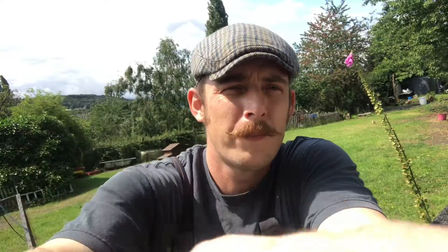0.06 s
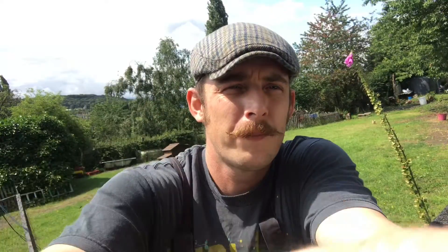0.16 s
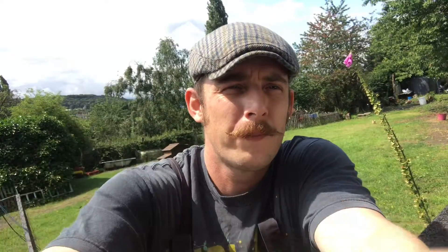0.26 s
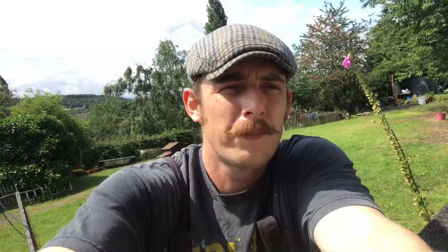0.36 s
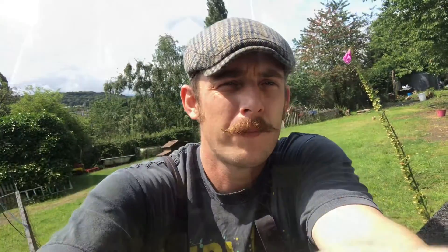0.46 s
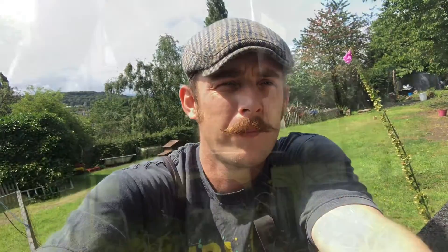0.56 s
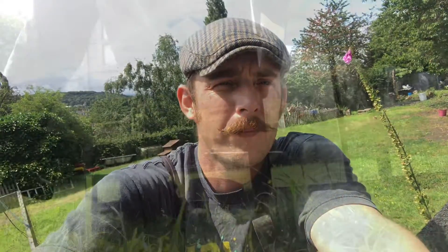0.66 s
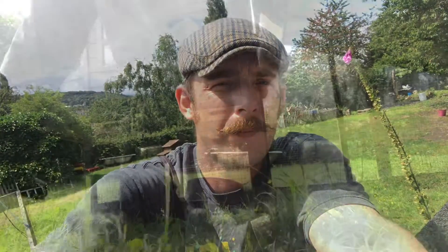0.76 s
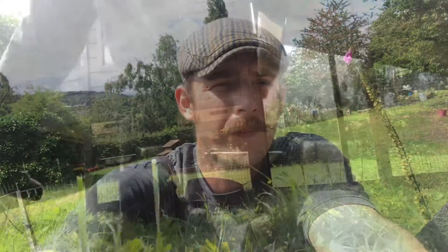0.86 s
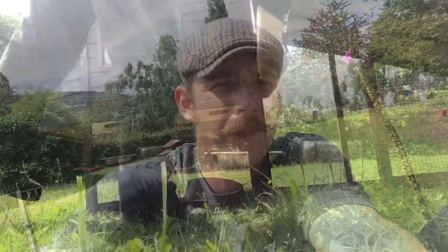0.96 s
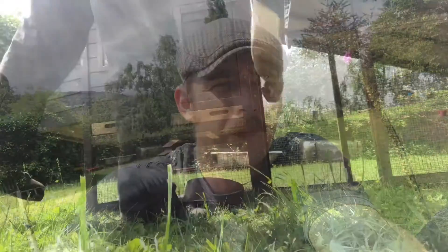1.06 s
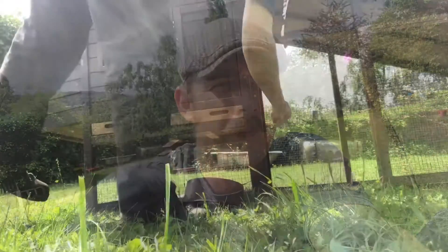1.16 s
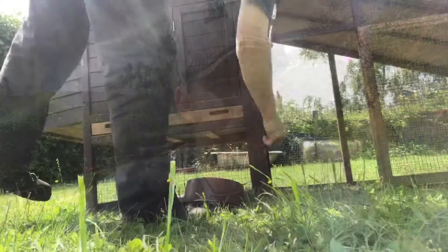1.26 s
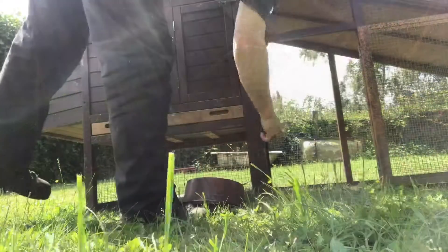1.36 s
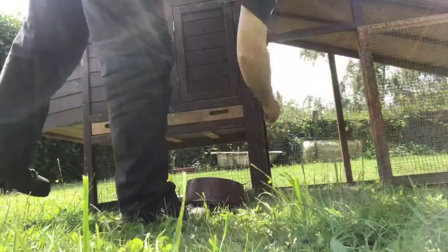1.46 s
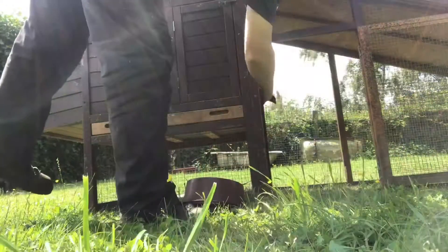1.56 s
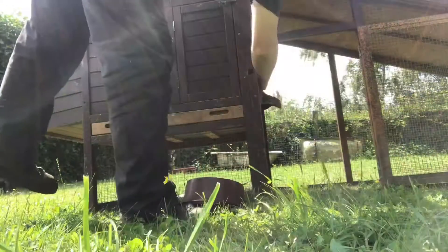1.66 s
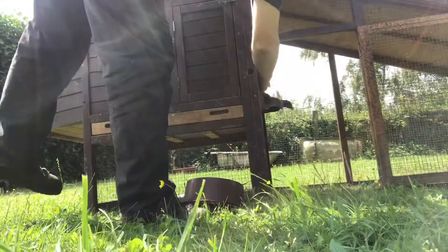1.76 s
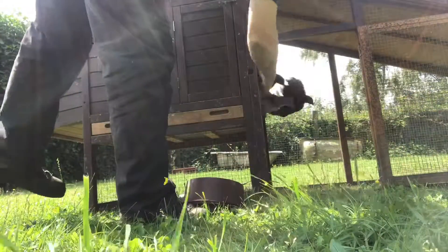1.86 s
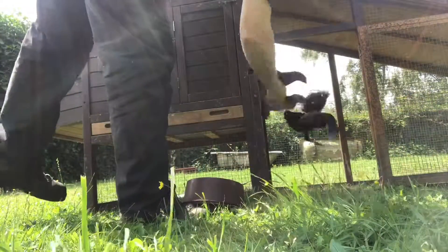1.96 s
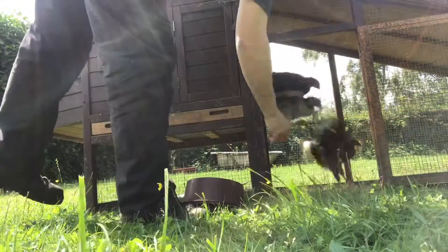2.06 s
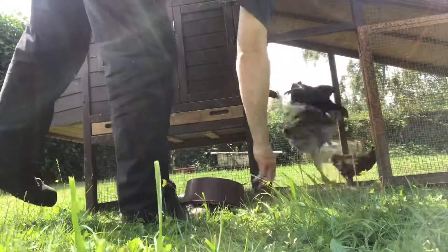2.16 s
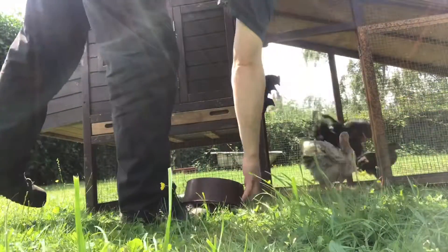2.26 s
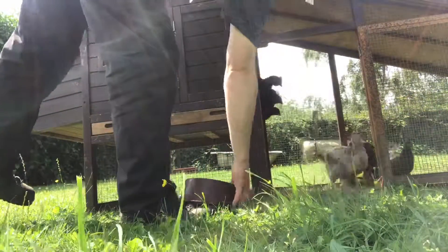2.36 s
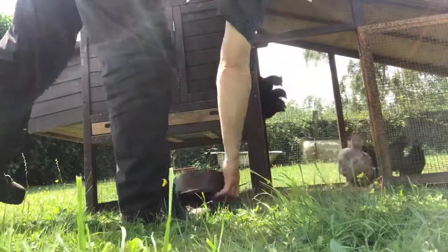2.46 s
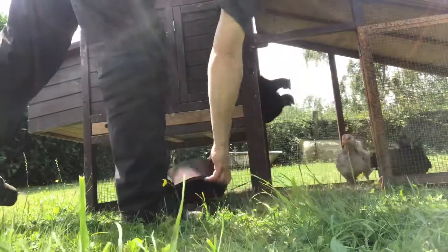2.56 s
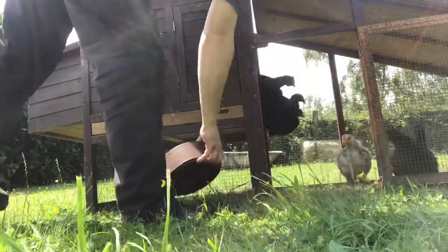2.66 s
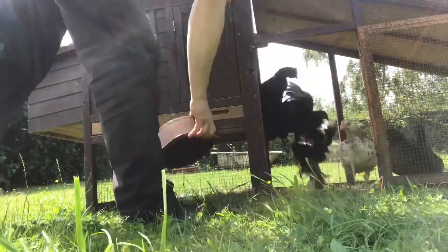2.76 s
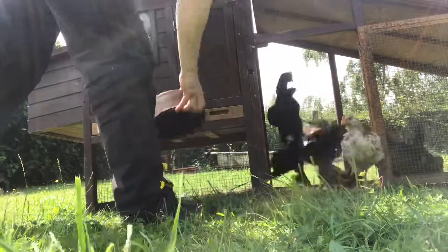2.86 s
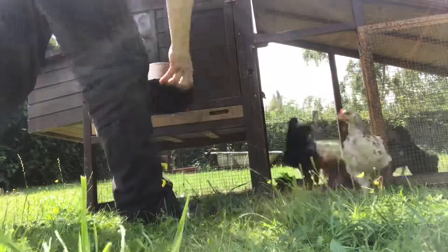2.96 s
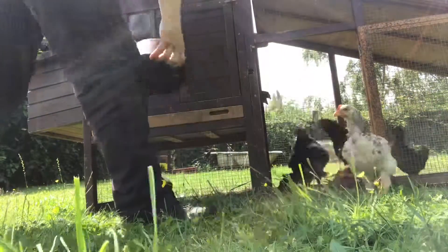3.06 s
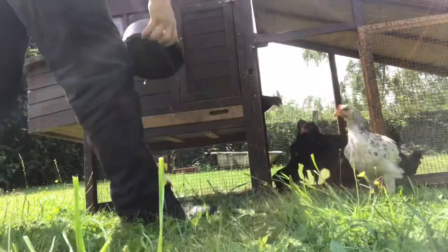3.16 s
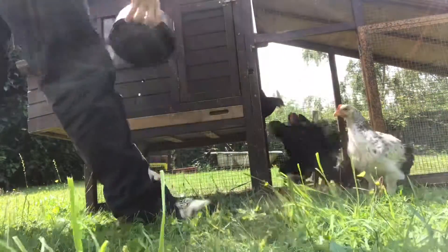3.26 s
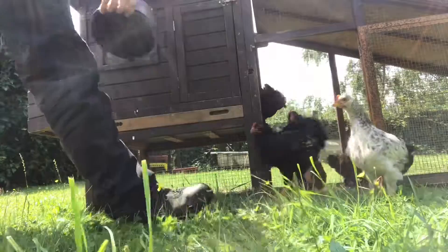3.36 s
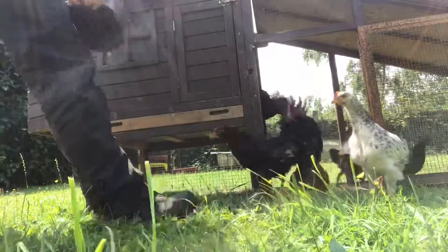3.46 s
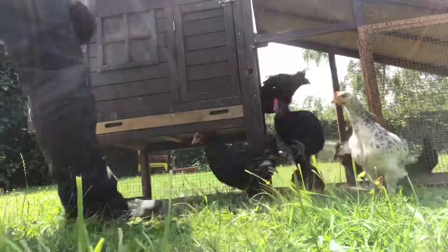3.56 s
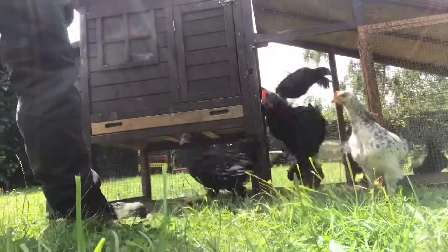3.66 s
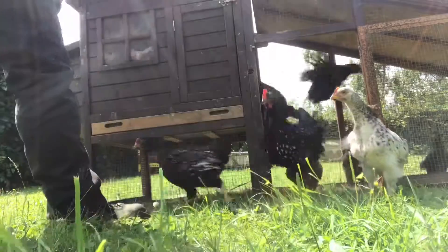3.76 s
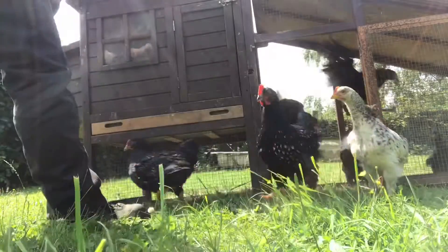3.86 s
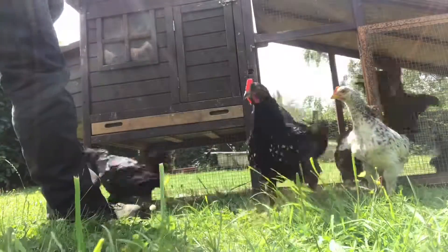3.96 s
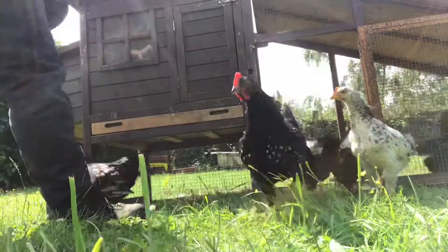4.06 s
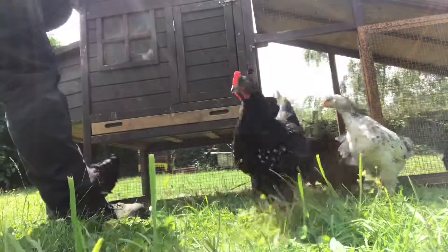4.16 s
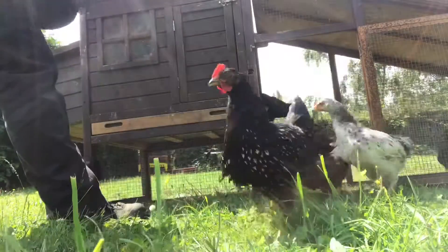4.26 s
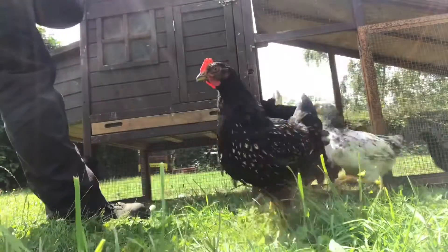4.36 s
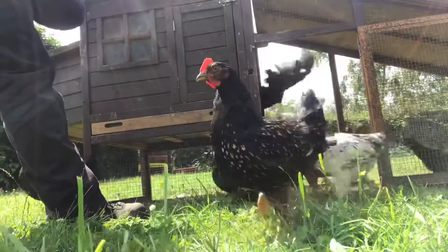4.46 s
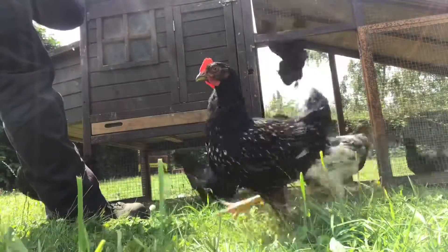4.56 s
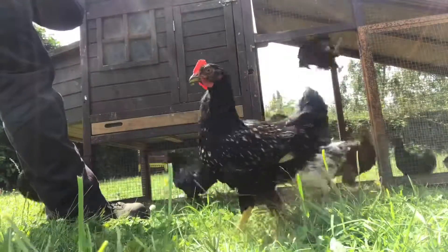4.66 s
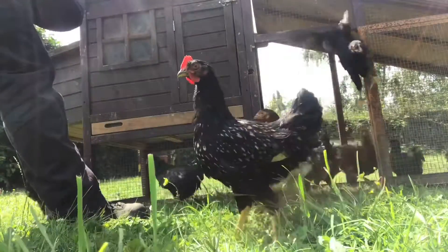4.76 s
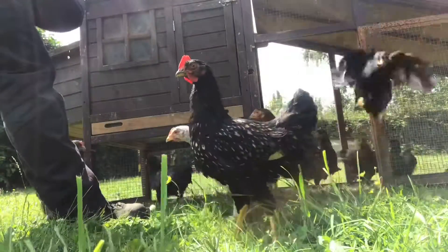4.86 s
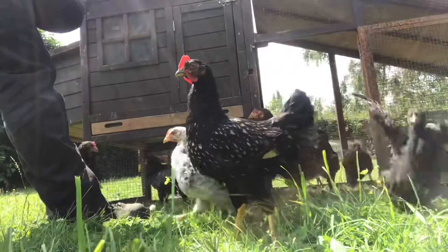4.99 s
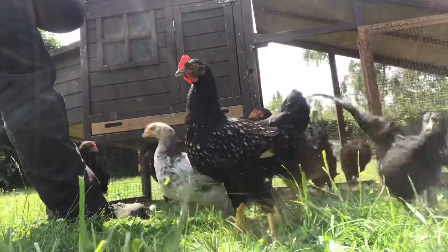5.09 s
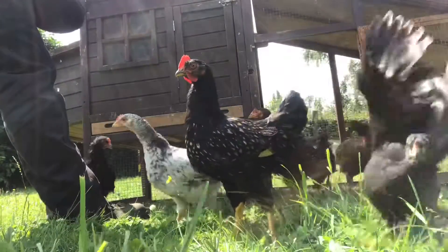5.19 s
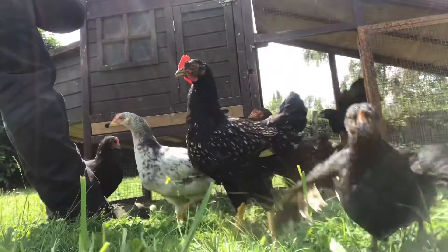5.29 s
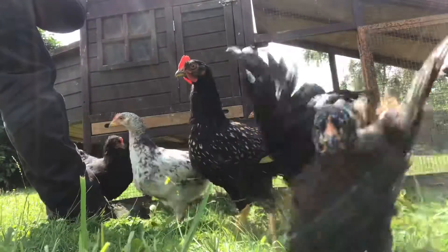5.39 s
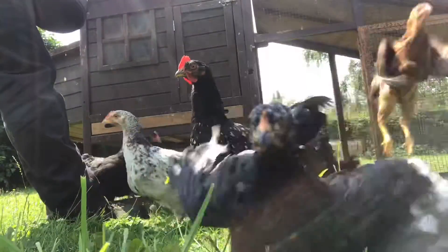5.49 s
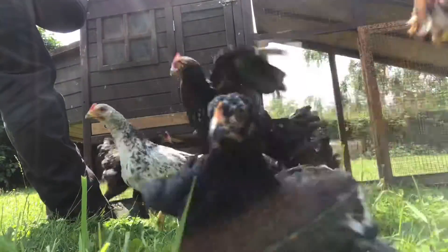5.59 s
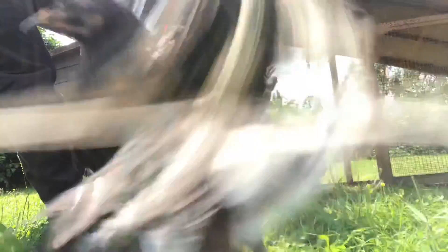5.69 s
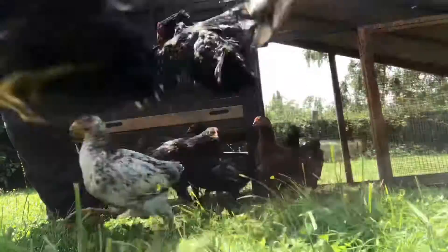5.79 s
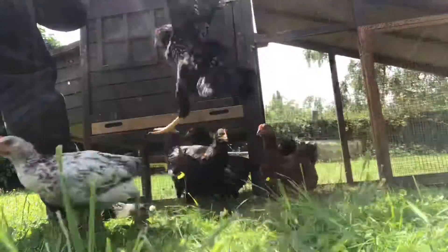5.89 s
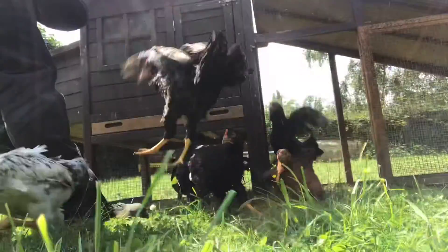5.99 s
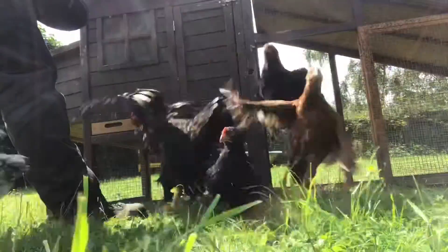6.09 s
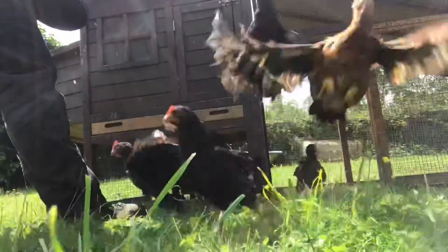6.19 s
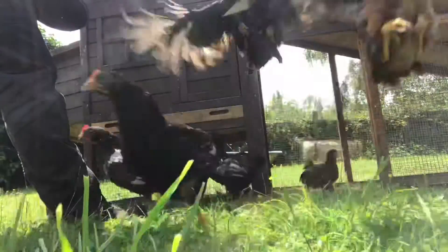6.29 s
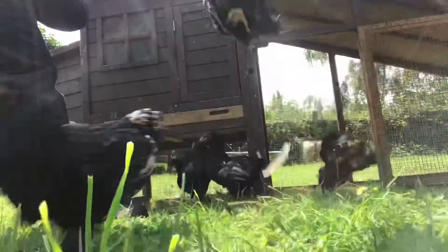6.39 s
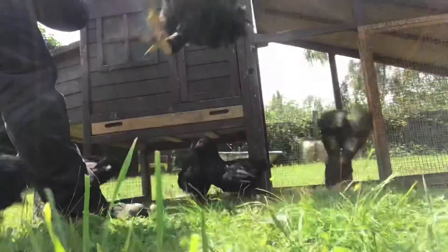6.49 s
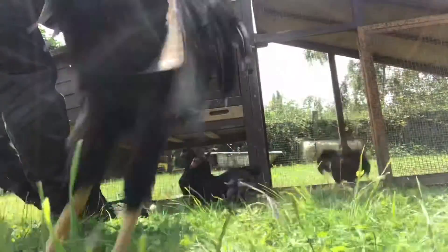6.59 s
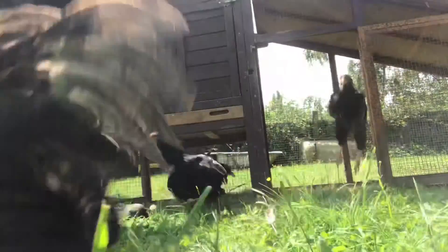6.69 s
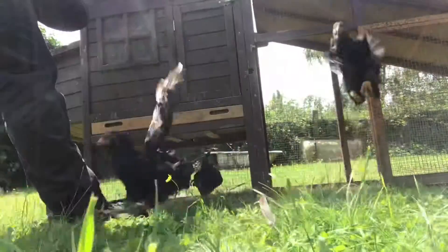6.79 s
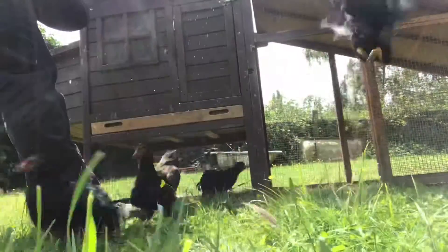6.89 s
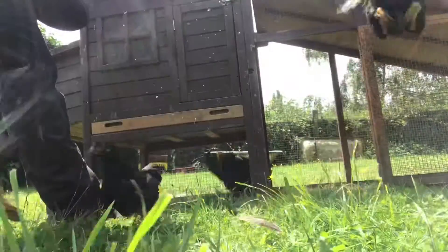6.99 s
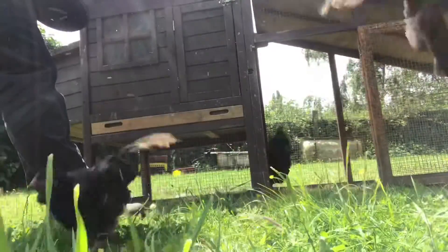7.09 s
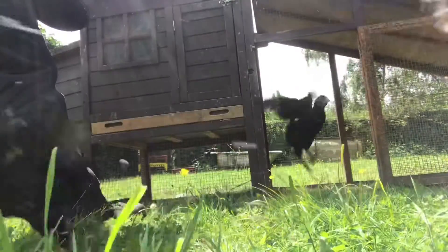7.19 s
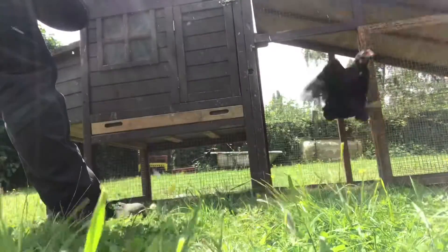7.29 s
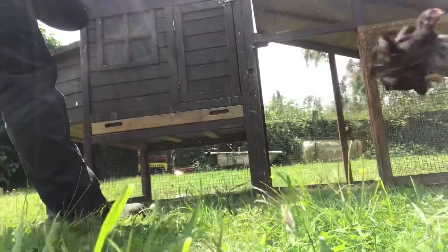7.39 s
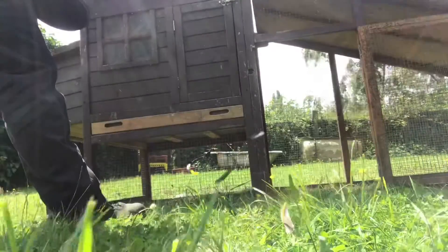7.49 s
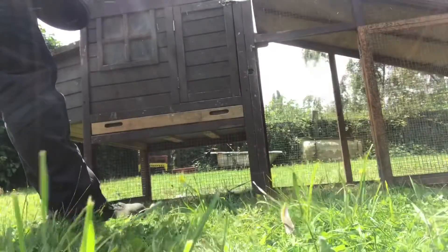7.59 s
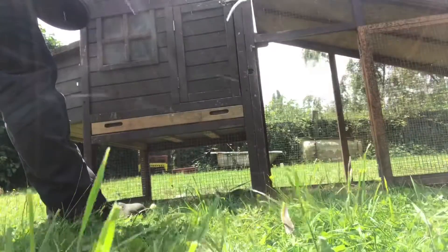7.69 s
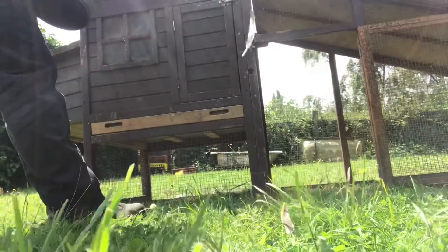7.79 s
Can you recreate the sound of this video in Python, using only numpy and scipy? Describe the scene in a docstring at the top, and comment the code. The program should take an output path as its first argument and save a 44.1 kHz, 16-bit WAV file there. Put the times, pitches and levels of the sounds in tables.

```python
"""Hens from coop to lawn

Hens leave a wooden coop onto a lawn: short gliding clucks and peeps, claws and a hatch ringing the boards.
Wing beats and feathers are bursts of grainy noise; from 5.6 s the flock takes fright and squawks close by,
built from syrinx partials and a beak resonance, while air blasts from wings thump on the microphone.
Below lie light wind and low buffeting, shaped noise, with more of the low buffeting in the first second."""
import sys
import numpy as np
from scipy import signal
from scipy.fft import rfft, irfft, next_fast_len
from scipy.io import wavfile

SR = 44100
rng = np.random.default_rng(int(sys.argv[2]) if len(sys.argv) > 2 else 0)


def to_wav(s):
    """Save 16-bit WAV."""
    ch = np.atleast_2d(s).T  # columns
    pcm = np.round(np.clip(ch, -1, 1) * 32767)  # PCM
    wavfile.write(sys.argv[1], SR, pcm.astype(np.int16))


N = 345832

# near squawks: (t/s, length/s, crest place as share of length, crest f/Hz, pitch arch as share,
#  crest level/dB, hoarseness 0-1, first partial/dB, third partial/dB, treble/dB,
#  beak resonance f/Hz, beak lift/dB, tilt/dB per octave); partials and treble are relative to the second
SQUAWK_CALLS = [(2.026, 0.039, 0.43, 754, 0.084, -29.5, 0.25, -12, -4, -15, 2950, 7, 2),
                (2.471, 0.065, 0.34, 671, 0.11, -45, 0.43, 6.5, -1, -1.5, 2520, 13, 4.5),
                (5.596, 0.034, 0.46, 627, 0.12, -40, 0.7, -1, -14, -7, 3800, 19, 0),
                (5.68, 0.03, 0.4, 654, 0.064, -20.5, 0.81, -35, -28, -12.5, 4070, 12, -15),
                (5.704, 0.036, 0.62, 639, 0.053, -17.5, 0.51, -24, -23, -14, 2440, 14, 0),
                (5.795, 0.05, 0.81, 520.4, 0.052, -21, 0.48, -44, -20, -15.5, 4150, 15, 5),
                (5.841, 0.041, 0.17, 685, 0.22, -22.5, 0.44, -21, -3.5, -7.5, 4380, 13, -7),
                (6.05, 0.046, 0.2, 650, 0.13, -32, 0.46, -12, -15, -14.5, 2600, -1, -14),
                (6.183, 0.053, 0.47, 656, 0.1, -24, 0.1, -20, -12.5, -25, 2400, 8, -2),
                (6.281, 0.047, 0.6, 602, 0.05, -15, 0.13, -14, -13, -17, 4300, 16, 6.5),
                (6.37, 0.058, 0.43, 700, 0.15, -7, 0.16, -23, -18.5, -13.5, 4570, 11, 8.5),
                (6.45, 0.065, 0.57, 683, 0.16, -9.5, 0.18, -20, -17.5, -12.5, 3350, 5.5, 11),
                (6.579, 0.059, 0.45, 692.4, 0.17, -8, 0.18, -19, -15, -11.5, 4340, 18.5, 11),
                (6.757, 0.05, 0.45, 617.6, 0.04, -20, 0.37, -17.5, -13, -14.5, 4460, 10, 7),
                (6.955, 0.068, 0.33, 589, 0.083, -37.5, 0.09, 2.5, -2, 9.5, 6050, 14, -7),
                (6.992, 0.063, 0.23, 615, 0.14, -33.5, 0.05, 0.5, -9, 3.5, 7100, 15, -10),
                (7.139, 0.084, 0.71, 593.5, 0.14, -32, 0.2, -6, -7, -3.5, 7000, 10, -3.5),
                (7.198, 0.058, 0.28, 632, 0.31, -28, 0.3, -7.5, -28, -6, 3560, 12, -2),
                (7.318, 0.062, 0.36, 706, 0.086, -31.5, 0.22, -18, -10, -17, 2800, 11, -6),
                (7.496, 0.066, 0.38, 671, 0.067, -41, 0.2, -21, -11, -11, 2650, 15, -11)]
# throat and beak colour of the upper partials: (f/Hz, level/dB)
BEAK_SPECTRUM = [(2000, 16), (3500, 11), (4600, 3), (5600, 1.5), (8000, -6.5), (11000, -10), (15000, -28)]
# small clucks and peeps: (t/s, nominal length/s, f/Hz, glide/Hz, level/dB, overtone/dB, hoarseness from 0)
CLUCK_CALLS = [(1.231, 0.039, 2780, -500, -51, -24, 0.2), (1.364, 0.031, 1360, 80, -39, -15, 0.16),
               (1.409, 0.031, 3080, 28, -49, -10, 0.37), (1.44, 0.014, 1406, -39, -39, -26, 0),
               (1.462, .03, 3020, -40, -51, -24, 0.15), (1.49, 0.053, 2580, 20, -54, -24, 0.1),
               (1.538, 0.025, 1570, -130, -35.5, -28, 0.08), (1.561, 0.015, 1710, 0, -35, -20, 0),
               (1.578, 0.0054, 1240, -200, -40, -24, 0.3), (1.643, 0.019, 1270, 0, -46.5, -24, 0),
               (1.697, 0.03, 1024, -20, -49, -24, 0), (1.793, 0.056, 1400, -600, -39, -11, 0.5),
               (1.825, 0.021, 590, -52, -39.5, -24, 0.2), (1.897, 0.018, 1690, -100, -35, -24, 0.3),
               (1.876, 0.02, 2210, 1700, -38, -24, 0.3), (1.888, 0.011, 2500, -1500, -34, -20, 0.4),
               (1.948, 0.032, 1980, -220, -28.5, -20, 0.35), (1.955, 0.038, 1400, -100, -41, -11, 0.15),
               (2.108, 0.035, 2830, -200, -41, -32, 0.2), (2.112, 0.034, 1885, -300, -29, -38, 0.24),
               (2.133, 0.012, 3000, -1200, -45, -30, 0.2), (2.146, .017, 2230, -200, -29.5, -30, .4),
               (2.159, 0.025, 1513, -100, -34.5, -29, 0.5), (2.292, 0.014, 1766, -600, -35, -30, 0.24),
               (2.303, 0.021, 1970, -18, -35.5, -32, 0.2), (2.308, 0.013, 1030, -50, -47, -24, 0.1),
               (2.423, 0.031, 3000, 410, -44.5, -29, .15), (2.444, 0.018, 1560, -20, -31, -26, 0.04),
               (2.464, 0.06, 1560, -520, -41, -29, 1.02), (2.585, 0.017, 1535, -110, -35.5, -36, 0.24),
               (2.655, 0.043, 1090, -100, -40.5, -29, 0.3), (2.661, 0.046, 1640, 0, -39.5, -27, 0.6),
               (2.708, 0.054, 1884, -300, -37, -13, 1.17), (2.798, 0.022, 2540, -300, -38, -26, 0.88),
               (2.871, 0.034, 1603, -2, -38.5, -13, 0.48), (2.891, 0.033, 2110, 0, -43.5, -22, 0.65),
               (2.902, 0.035, 1170, -200, -44, -21, 0.6), (3.022, 0.015, 1470, 508, -45, -24, 0.1),
               (3.046, 0.0062, 1480, -100, -34, -22, 0.3), (3.051, 0.01, 1164, 0, -36.5, -22, 0.35),
               (3.093, 0.017, 1850, 2, -37, -24, 0.3), (3.112, 0.044, 1497, -150, -39, -13, 0.64),
               (3.153, 0.0082, 846, -70, -35.5, -5, 0), (3.244, 0.0093, 1760, -140, -37, -32, 0.15),
               (3.252, 0.024, 517, -67, -39.5, 3.5, 0.2), (3.386, 0.021, 980, -100, -43, -1.5, 0),
               (3.609, .022, 2295, 30, -47.5, -24, 0.1), (3.624, 0.036, 1266, -50, -53, -4, 0.03),
               (3.786, 0.018, 2290, -20, -45, -22, 0.15), (3.803, 0.027, 1320, -30, -46, -7, 0.03),
               (3.954, 0.029, 1113, 0, -40, -16, 0.14), (3.984, 0.022, 768, -110, -43.5, -9, 0.4),
               (3.985, 0.027, 2480, -330, -50, -24, 0.2), (4.171, 0.048, 952, -320, -41, -19, 0.32),
               (4.383, 0.014, 2320, -40, -47, -26, .02), (4.386, 0.039, 1290, -60, -44, -22, 0.07),
               (4.429, 0.011, 2350, 0, -48, -22, 0.2), (4.456, .021, 1360, 20, -49.5, -24, .15),
               (4.567, .017, 2280, 10, -52, -24, .07), (4.577, 0.035, 1300, -12, -44, -15, 0.25),
               (4.581, 0.013, 4100, 300, -51.5, -24, 0.6), (4.787, 0.019, 2380, -150, -48, -24, 0.2),
               (4.8, .036, 1480, 122, -48, -7.5, 0.42), (5.226, 0.017, 1250, 100, -44.5, -18, 0),
               (5.241, 0.04, 2540, -680, -46.5, -28, 0.3), (5.386, 0.055, 2370, -130, -55, -24, 0.3),
               (5.411, .019, 1310, -20, -50, -24, .02), (5.59, 0.034, 1600, 150, -39.5, -24, 0.1),
               (5.613, 0.031, 1240, 100, -35, -28, 0.6), (5.668, .018, 1440, 150, -38, -24, 0.3),
               (5.688, 0.015, 1555, -130, -20, -33, 0.14), (5.702, 0.022, 1704, -160, -26, -23, 0.72),
               (5.819, 0.026, 1695, 402, -18.5, -16, 0.25), (6.275, 0.015, 1285, -110, -35, -25, 1.01),
               (6.355, .03, 666, -110, -32.5, -22, 0.2), (6.363, 0.01, 4150, -400, -32, -35, 0.3),
               (6.432, 0.021, 1250, -5, -26.5, -21, 0.26), (6.81, 0.026, 654, -100, -34, -24, 0.2),
               (6.824, 0.017, 2150, 30, -37, -24, 0.26), (6.835, 0.026, 1460, -90, -32.5, -27, .35),
               (6.87, 0.012, 1230, 150, -39, -26, 0.3), (6.902, 0.023, 1233, -100, -30, -35, 0.35),
               (7.041, 0.015, 1390, -92, -22, -23, 0.44), (7.18, 0.022, 1830, 0, -33, -24, 0.1),
               (7.328, 0.034, 2062, -130, -45, -24, .02), (7.383, 0.041, 984, 140, -39, -24, 0.44),
               (7.503, 0.034, 1905, -320, -42, -24, 0.4), (7.588, 0.018, 853, 110, -40.5, -24, 0.14),
               (7.753, 0.021, 1647, -20, -43.5, -24, 0.4), (7.761, 0.031, 1116, -20, -40, -18, 0.15)]
# wing beats and feather rustles: (t/s, time scale/s, hiss level/dB, swish over hiss/dB)
WING_BEATS = [(0.746, 0.0094, -58, 11), (1.201, 0.0066, -54, 11.5), (1.277, 0.011, -60, 18.5),
              (1.363, 0.023, -54, 20), (1.487, 0.0097, -59, 20), (1.609, .005, -55, 13),
              (1.585, 0.015, -55, 17.5), (1.821, 0.013, -54.5, 15.5), (1.923, 0.011, -46, 15.5),
              (2, 0.0073, -61, 15), (2.084, 0.0055, -73, 11), (2.159, 0.0044, -39, 7.5),
              (2.165, 0.0088, -54, 25), (2.232, 0.0085, -47, 9), (2.337, 0.017, -48, 12.5),
              (2.677, 0.094, -46.5, 9), (2.694, 0.033, -45, -7), (2.77, 0.0052, -52, 3),
              (2.787, 0.0077, -46.5, 6), (2.799, 0.027, -39.5, 4.5), (2.865, 0.014, -51, 9),
              (2.967, 0.014, -45, 9), (3.105, 0.052, -45.5, 0.5), (3.36, 0.0071, -46, -4),
              (3.393, 0.017, -59, 17), (3.518, 0.012, -52, 6.5), (3.626, 0.18, -58.5, -14),
              (3.932, 0.039, -52, 10.5), (4.011, 0.036, -55.5, 10), (4.579, 0.012, -51.5, -3),
              (4.629, 0.027, -55, 10.5), (4.685, 0.025, -55.5, 11.5), (4.711, 0.024, -46, 6.5),
              (4.848, 0.071, -49, 8), (5.1, 0.04, -51, -7), (5.5, 0.0028, -35, -30),
              (5.512, 0.063, -53, -23), (5.641, 0.025, -58, 20), (5.742, 0.019, -45, 8),
              (5.845, 0.018, -27, 5), (5.9, 0.02, -55, 18.5), (5.961, 0.064, -52, 11),
              (6.182, 0.042, -41.5, 13.5), (6.239, 0.013, -42, -10), (6.436, 0.011, -46, 8),
              (6.649, 0.0071, -44, -14), (7.115, 0.011, -48, -4), (7.224, 0.014, -32, 4),
              (7.255, 0.015, -39, -15), (7.283, 0.023, -45, 9), (7.332, 0.023, -39.5, 10.5),
              (7.386, 0.025, -47.5, 8), (7.46, 0.0079, -36.5, 6.5), (7.515, 0.033, -51.5, 12),
              (7.623, 0.056, -53, -4), (7.738, 0.038, -46, -6)]
# claws and hatch on boards: (t/s, level/dB, dullness/dB per octave)
BOARD_KNOCKS = [(0.434, -34, 7.5), (1.116, -40, -3.5), (1.371, -29.5, 9), (1.929, -20, -3),
                (2.206, -32.5, -5.5), (2.39, -33, 0), (3.517, -35, 4), (5.602, -34, -4),
                (6.14, -27.5, 13.5), (6.154, -35.5, 13.5), (6.879, -27.5, 10)]
# resonances of the boards: (f/Hz, level/dB, fall by 60 dB/s)
BOARD_MODES = [(346, -3.5, 0.0087), (580, -6, 0.018), (1110, -7.5, 0.023), (1390, -1.5, 0.0076),
               (2630, -10.5, 0.013), (3840, -38, 0.0074), (6100, -19.5, 0.0043)]
# ticks of claws and dry stalks: (t/s, level of first click/dB, f/Hz)
STALK_TICKS = [(2.6823, -37, 5750), (2.7204, -26, 3100), (2.7657, -29, 6450), (2.79, -31, 5840),
               (3.4694, -48, 3690), (3.7239, -40, 5020), (3.876, -40, 4110), (3.893, -41, 4520),
               (7.0464, -37, 3410)]
# low thumps of landings and wing blasts: (t/s, level/dB, f/Hz)
LOW_THUMPS = [(0.432, -30.5, 65), (0.704, -26, 154), (1.002, -29, 296), (1.288, -22, 170),
              (1.368, -16.5, 139), (1.589, -25, 210), (1.728, -16, 124), (1.735, -21, 333),
              (1.991, -23, 114), (2.079, -23, 88.5), (2.194, -25, 169), (2.381, -22, 133),
              (3.291, -22, 107), (3.322, -28.5, 171), (3.577, -28.5, 181), (3.747, -26.5, 150),
              (4.475, -29.5, 63.7), (4.56, -31, 60.3), (4.896, -29.5, 330), (4.96, -29.5, 64),
              (5.013, -31, 265), (5.076, -28.5, 64.4), (5.836, -7.5, 60.5), (6.138, -13.5, 60),
              (6.197, -16.5, 82), (6.282, -16, 81), (6.334, -23.5, 126), (6.817, -15.5, 75),
              (6.846, -23, 80.6), (6.895, -9, 61.4), (6.971, -29, 117), (6.992, -22, 141),
              (7.016, -24, 101), (7.121, -19, 76), (7.299, -17, 67), (7.311, -19.5, 223), (7.437, -21, 296),
              (7.75, -18.5, 135.5), (7.771, -17.5, 57)]
# course of the background: (t/s, wind level/dB, flock shuffle level/dB)
BACKGROUND_LEVELS = [(0.0, -50.5, -63.5), (1.05, -46.5, -57), (1.35, -41, -54.5), (1.7, -38, -51.5),
                     (1.99, -40.5, -44), (2.44, -41.5, -51.5), (2.84, -43.5, -48), (3.38, -44, -53),
                     (3.5, -46.5, -53.5), (5.17, -45, -59), (5.45, -48.5, -52), (5.7, -39.5, -48),
                     (6.01, -39.5, -51.5), (6.18, -35.5, -49.5), (6.4, -45, -44), (6.66, -36, -51.5),
                     (6.94, -25, -45.5), (7.29, -37.5, -46), (7.55, -36.5, -50), (7.84, -35.5, -60.5)]
# feet and feathers come close on the lawn: (t/s, rustle over shuffle/dB)
LAWN_RUSTLE = [(1.3, -25), (3.5, -9.5), (5.6, -6)]
# start and end of the easing of the extra buffeting: (t/s, t/s)
BUFFETING_EASES_S = (0.27, 1.42)
# colour of wind on the microphone: (f/Hz, level/dB)
WIND_SPECTRUM = [(20, -51), (35, 5), (45, 17), (65, 18), (100, 10), (200, -41.5)]
# colour of the low buffeting that rises with the wind: (f/Hz, level/dB)
BUFFETING_SPECTRUM = [(50, -41), (120, 2), (200, 0.5), (320, -2.5), (420, -9.5), (550, -12), (900, -21.5),
                      (2000, -30.5), (5000, -58)]
# colour of the flock's shuffle and the wing swish: (f/Hz, level/dB)
SHUFFLE_SPECTRUM = [(300, 10), (700, -5.5), (1500, 2), (2500, -3.5), (4000, -8.5), (7000, -15),
                    (10000, -56)]
# colour of feather hiss and grass rustle: (f/Hz, level/dB)
HISS_SPECTRUM = [(1500, -3.5), (4000, 3.5), (6500, 3.5), (10500, -2), (12500, -1), (16000, -5)]
# returns from ground and coop walls: (delay/s, level/dB)
WALL_ECHOES = [(0.009, -19.5), (.023, -27.5)]
# dips in the microphone's response: (f/Hz, width/Hz, share removed)
MICROPHONE_DIPS = [(4920, 460, 0.37), (10500, 290, 0.56)]

CUTOFF_HZ = 15800   # top of the microphone's band
# squawks
RASP, HOARSE_RASP = 0.24, 0.9   # noise riding on the upper partials: share in a clear call, extra in a hoarse one
EFFORT = 0.068   # gain of the upper partials in dB for each dB of swell
POINTED = 1.676   # the pitch crest is sharper than the swell by this power
SWELL_S, SAG_PER_S = 0.081, 0.45   # short calls are peaked, long ones hold; pitch share lost per second
BEAK_WIDTH = 0.14   # share of the resonance's pitch
DARKEN = 0.089   # dB per octave lost for each dB under the crest
# clucks
CLUCK_ARCH, ARCH_FROM_DB = 0.0054, -54   # share of pitch bowed upward per dB above this level
# contacts and thumps
STRIKE_SPREAD_DB = 2.5
CONTACT_CYCLES = 0.41   # a contact lasts about this many cycles of each mode
TICK_CYCLES = 13   # cycles to fall by 60 dB
# ring at 100 Hz and -11.5 dB; high and loud thumps ring more cycles
RING_CYCLES, CYCLES_PER_OCTAVE, CYCLES_PER_DB = 9.6, 9.1, 0.53
# buffeting level when wind is at -41 dB; share of the wind's swing it follows; extra at the start
BUFFETING_DB, BUFFETING_FOLLOWS, EARLY_BUFFETING_DB = -44.5, 0.82, 8.5


def amp(db):
    """Decibels to gain."""
    return 10 ** (np.asarray(db) / 20)


def rms_one(x):
    """Scale to unit rms."""
    return x / np.sqrt(np.mean(x ** 2) + 1e-20)


def at_hz(points, hz):
    """Read a spectrum table on a log-frequency axis."""
    table = np.array(points)
    return np.interp(np.log(hz), np.log(table[:, 0]), table[:, 1])


def drift(rate_hz, size=N):
    """Low-passed chance that wanders on the scale of rate_hz; rms 1."""
    r = np.exp(-2 * np.pi * rate_hz / SR)
    settle = 20000   # samples thrown away while the filter settles
    white = rng.standard_normal(size + settle)
    return rms_one(signal.lfilter([1], [1, -2 * r, r * r], white)[settle:])


def noise(spectrum, grain_db=0., per_s=4000.):
    """Steady noise plus random grains of uneven size, coloured by a spectrum; rms 1."""
    white = rng.standard_normal(N)
    hits = rng.random(N) < per_s / SR
    sizes = amp(grain_db * rng.exponential(1, N).clip(0, 4))
    white = white + hits * sizes * rng.choice([-1, 1], N)
    size = next_fast_len(N)
    hz = np.arange(size // 2 + 1) * SR / size + 1
    return rms_one(irfft(rfft(white, size) * amp(at_hz(spectrum, hz)), size)[:N])


def ring(x, hz, t60):
    """A damped resonance: a unit click sets a sine of height 1 ringing."""
    r, w = amp(-60 / (t60 * SR)), 2 * np.pi * hz / SR
    return signal.lfilter([0, np.sin(w)], [1, -2 * r * np.cos(w), r * r], x + 1e-18)


def add(out, s, sound):
    """Mix a sound in at time s."""
    i = round(s * SR)
    out[i:i + len(sound)] += sound[:N - i]


def squawks():
    """Syrinx partials through throat and beak; pitch arches with the swell, hoarse calls wobble and rasp."""
    out = np.zeros(N)
    k = np.arange(4, 26)[:, None]   # numbers of the upper partials
    for (s, length, crest, crest_hz, arch, crest_db, hoarse, first_db, third_db, treble_db,
         beak_hz, lift_db, tilt_db) in SQUAWK_CALLS:
        t = np.arange(0, length, 1 / SR)
        progress = np.interp(t / length, [0, np.clip(crest, 0.05, 0.95), 1], [0, 0.5, 1])
        push = np.sin(np.pi * progress)
        under_db = SWELL_S / length * 20 * np.log10(push + 0.001)   # level relative to the crest

        # the pitch also sags as breath runs out
        pitch = crest_hz * (1 - arch * (1 - push ** POINTED) - SAG_PER_S * (t - crest * length))
        wobble = 1 + 0.13 * hoarse ** 1.7 * drift(280, len(t))
        phase = 2 * np.pi * np.cumsum(pitch * wobble) / SR

        hz = k * pitch
        lift = lift_db / (1 + ((hz - beak_hz) / (BEAK_WIDTH * beak_hz)) ** 2)
        tilt = (tilt_db + DARKEN * under_db) * np.log2(hz / 3000)
        # each upper partial swells on its own
        swell_turns = rng.random(k.shape) + rng.uniform(8.9, 21.7, k.shape) * t
        swell_db = 5.8 * np.sin(2 * np.pi * swell_turns)
        gains = amp(at_hz(BEAK_SPECTRUM, hz) + lift + tilt + swell_db) * (hz < CUTOFF_HZ)
        treble = np.sum(gains * np.sin(k * phase + 0.129 * k * k), axis=0)
        treble = treble / np.sqrt(np.sum(gains ** 2, axis=0))

        rasp = RASP + HOARSE_RASP * hoarse
        upper = amp(treble_db) * treble + amp(third_db) * np.sin(3 * phase)
        upper *= amp(EFFORT * under_db) * (1 + rasp * drift(930, len(t))) / np.sqrt(1 + rasp ** 2)
        voice = np.sin(2 * phase) + amp(first_db) * np.sin(phase) + upper
        level_db = crest_db + under_db + 5.7 * hoarse * drift(162, len(t))
        add(out, s, np.sqrt(2) * amp(level_db) * voice)
    return out


def clucks():
    """A gliding tone with its overtones under a rounded envelope; hoarse ones break up into grit."""
    out = np.zeros(N)
    for s, length, hz, glide, level_db, overtone_db, hoarse in CLUCK_CALLS:
        u = np.linspace(0, 1, round(1.3 * length * SR))
        arch = CLUCK_ARCH * min(level_db - ARCH_FROM_DB, 25) * (np.sin(np.pi * u) - 0.7)
        pitch = hz * (1 + arch) + glide * np.clip((u - 0.5) / 0.633, -0.5, 0.5)
        wobble = 1 + 0.12 * hoarse ** 2 * drift(166, len(u))
        phase = 2 * np.pi * np.cumsum(pitch * wobble) / SR
        tone = np.sin(phase) + amp(overtone_db) * (np.sin(2 * phase) + 0.25 * np.sin(3 * phase))
        grit = (1 + 2.0 * hoarse * drift(316, len(u))) / np.sqrt(1 + hoarse)
        envelope = np.abs(np.sin(np.pi * u)) ** 0.6
        add(out, s - 0.14 * length, amp(level_db) * envelope * tone * grit)
    return out


def wings():
    """Each beat: grainy feather hiss and a duller swish, rising fast and fading."""
    hiss, swish = np.zeros(N), np.zeros(N)
    for s, length, hiss_db, swish_db in WING_BEATS:
        u = np.arange(0, 3, 1 / (length * SR))
        shape = np.minimum(u / 0.22, 1) * np.exp(-(u / 0.91) ** 1.41)
        add(hiss, s, amp(hiss_db) * shape)
        add(swish, s, amp(hiss_db + swish_db) * shape)
    flutter = amp(3.4 * drift(97))
    feathers = hiss * noise(HISS_SPECTRUM, grain_db=-12.0)
    return flutter * (feathers + swish * noise(SHUFFLE_SPECTRUM, grain_db=1.5))


def knocks():
    """Each contact strikes every board mode with its own strength; dull contacts excite high modes less."""
    s, level_db, dull_db = np.transpose(BOARD_KNOCKS)
    strength_db = rng.normal(0, STRIKE_SPREAD_DB, (len(s), len(BOARD_MODES)))
    out = np.zeros(N)
    for k, (hz, mode_db, t60) in enumerate(BOARD_MODES):
        clicks = np.zeros(N)
        strike_db = level_db + mode_db - dull_db * np.log2(hz / 1000) + strength_db[:, k]
        clicks[np.round(s * SR).astype(int)] = amp(strike_db)
        push = np.hanning(round(CONTACT_CYCLES * SR / hz) + 3)
        out += ring(signal.lfilter(2 * push / push.sum(), [1], clicks), hz, t60)
    return out


def ticks():
    """Each tick is a quick run of four growing clicks ringing a few cycles at its own pitch."""
    out = np.zeros(N)
    for s, level_db, hz in STALK_TICKS:
        clicks = np.zeros(700)
        places = np.cumsum([0, *rng.integers(15, 90, size=3)])
        clicks[places] = amp(level_db) * 1.25 ** np.arange(4)
        add(out, s, ring(clicks, hz, TICK_CYCLES / hz))
    return out


def thumps():
    """The pressure builds for about half a cycle, swings once hard, then rings out."""
    out = np.zeros(N)
    for s, level_db, hz in LOW_THUMPS:
        cycles = RING_CYCLES + CYCLES_PER_OCTAVE * np.log2(hz / 100) + CYCLES_PER_DB * (level_db + 11.5)
        cycles = max(cycles, 1)
        u = np.arange(-0.5, 1.5 * cycles + 1, hz / SR)   # time in cycles
        build = np.sin(np.pi / 2 * np.clip((u + 0.5) / 0.88, 0, 1)) ** 8.1
        decay = amp(-60 * np.maximum(u - 0.9, 0) / cycles)
        add(out, s, -amp(level_db) * build * decay * np.sin(2 * np.pi * u))
    return out


def background():
    """Lumpy wind, low buffeting that follows the wind, flock shuffle, crackling grass: four shaped noises."""
    t = np.arange(N) / SR
    s, wind_points, shuffle_points = np.transpose(BACKGROUND_LEVELS)
    wind_db = np.interp(t, s, wind_points)
    shuffle_db = np.interp(t, s, shuffle_points)
    early_db = np.interp(t, BUFFETING_EASES_S, [EARLY_BUFFETING_DB, 0])
    buffeting_db = BUFFETING_DB + BUFFETING_FOLLOWS * (wind_db + 41.0) + early_db
    rustle_db = shuffle_db + np.interp(t, *np.transpose(LAWN_RUSTLE))

    busy = np.clip((shuffle_db + 61) / 12, 0.15, 1)   # a louder flock: lumpier buffeting, shuffle and rustle
    stir_db = 2.0 * busy * drift(27.0)   # one movement raises shuffle and rustle together
    wind = amp(wind_db + 1.4 * drift(8.2) + 1.6 * drift(1.2)) * noise(WIND_SPECTRUM)
    buffeting = amp(buffeting_db + 5.5 * busy * drift(21.2)) * noise(BUFFETING_SPECTRUM)
    shuffle = amp(shuffle_db + stir_db + 4.7 * busy * drift(55))
    shuffle = shuffle * noise(SHUFFLE_SPECTRUM, grain_db=3.5, per_s=340.0)
    rustle = amp(rustle_db + stir_db + 2.0 * drift(89))
    rustle = rustle * noise(HISS_SPECTRUM, grain_db=4.5, per_s=780.0)
    return wind + buffeting + shuffle + rustle


def scene():
    """Birds and boards with two dull echoes, over thumps and background."""
    near = squawks() + clucks() + wings() + knocks() + ticks()
    dull = signal.sosfilt(signal.butter(1, 3500, fs=SR, output="sos"), near)
    out = near + thumps() + background()
    for delay_s, db in WALL_ECHOES:
        add(out, delay_s, amp(db) * dull)
    return out[None]


def record(dry):
    """The microphone cuts the lowest bass and the top, dips in two bands and slightly rounds the peaks."""
    x = signal.sosfilt(signal.butter(2, 28, "high", fs=SR, output="sos"), dry)
    for hz, width_hz, share in MICROPHONE_DIPS:
        x = x - share * signal.lfilter(*signal.iirpeak(hz, hz / width_hz, fs=SR), x)
    x = 1.3 * np.tanh(x / 1.3)
    return signal.sosfilt(signal.ellip(12, 0.5, 70, CUTOFF_HZ, fs=SR, output="sos"), x)


dry = scene()
out = record(dry)
to_wav(out)
```